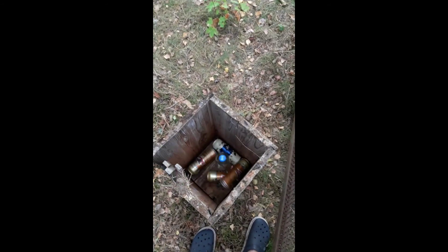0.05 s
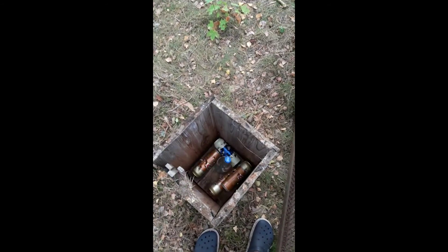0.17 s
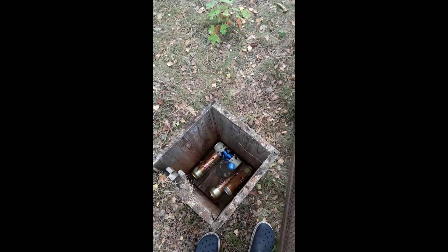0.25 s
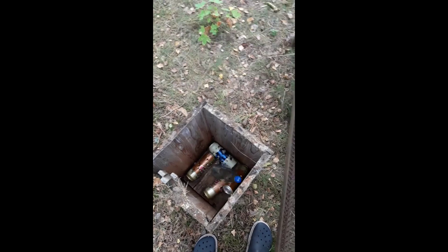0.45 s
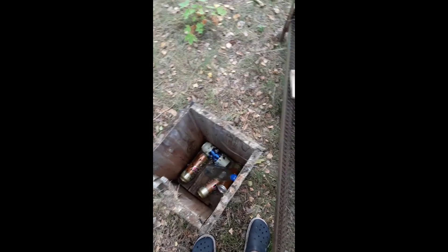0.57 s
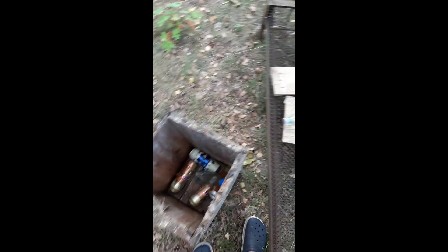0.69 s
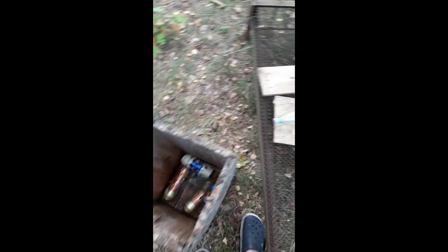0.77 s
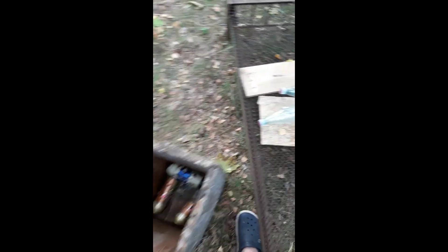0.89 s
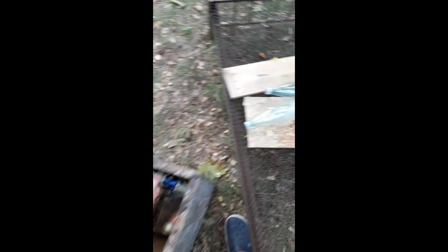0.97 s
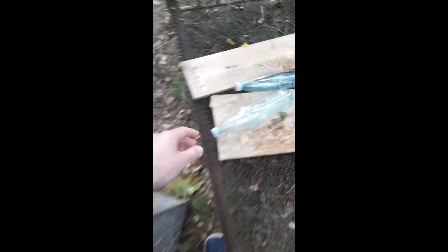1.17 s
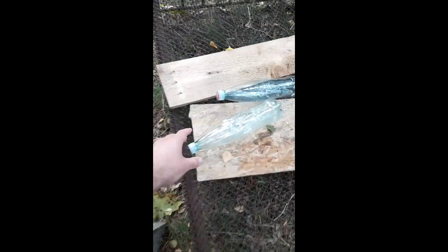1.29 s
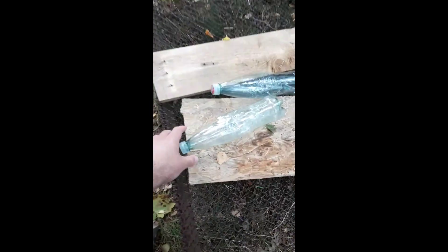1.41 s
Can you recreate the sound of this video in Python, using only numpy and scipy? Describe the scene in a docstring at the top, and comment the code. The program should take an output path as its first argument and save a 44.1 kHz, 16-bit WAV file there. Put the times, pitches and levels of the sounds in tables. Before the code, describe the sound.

At about 0.2 seconds, cans and bottles drop into a metal bin with a loud clatter of hollow knocks and short ringing clangs. From 0.5 seconds one can rolls, scraping and making the bin hum, then hits another with a bright clack near 0.65. Everything settles by 0.8. From about 1.1 to 1.45 seconds, sleeves and dry leaves rustle faintly with a few small taps over quiet outdoor air.

```python
"""Cans and bottles tumble into an open metal bin and clatter against its walls and each other for 0.5 s.
Each collision gives a hollow knock and rings the modes of bin and cans. One can rolls, making the bin
hum, and strikes its neighbour with a bright clack before all settle. Then sleeves and dry leaves
rustle faintly, with a few small taps, over quiet outdoor air."""
import sys
import numpy as np
from scipy import signal
from scipy.fft import rfft, irfft, next_fast_len
from scipy.io import wavfile

SR = 44100
rng = np.random.default_rng(int(sys.argv[2]) if len(sys.argv) > 2 else 0)


def generate_wav(sig):
    """Save sig (samples, or channels by samples) to the path in sys.argv[1] as 16-bit PCM at SR."""
    pcm = np.round(np.clip(np.atleast_2d(sig).T, -1, 1) * 32767).astype(np.int16)
    wavfile.write(sys.argv[1], SR, pcm)


N = 63945

# collisions: start_s, knock_db, knock_hz, bin_db, cans_db, clash_db
COLLISIONS = [(0.218, -16.5, 611, -23.5, -21.5, -18), (0.2385, -40, 1004, -20, -23.5, -21),
              (0.248, -9.5, 796, -14.5, -17, -11.5), (.263, -20, 700, -32, -17, -12),
              (0.2711, -26, 870, -27, -16, -18), (0.2829, -15.5, 428, -16.5, -18, -16),
              (0.2924, -21, 366, -15, -19.5, -18.5), (.311, -23, 420, -19.5, -17.5, -21),
              (0.328, -16, 570, -18.5, -22.5, -29.5), (.346, -20, 668, -23, -17.5, -42),
              (0.354, -17, 420, -16, -19, -28.5), (.376, -16, 837, -17.5, -19.5, -29),
              (.388, -19, 437, -28, -31.5, -28.5), (0.3947, -10, 398, -26, -21, -34),
              (0.413, -19.5, 700, -17, -25.5, -31.5), (.436, -24, 1147, -20, -27.5, -26.5),
              (0.4523, -16, 392, -54, -26, -33.5), (0.464, -19.5, 366, -24, -31.5, -39.5),
              (0.4848, -17.5, 437, -27.5, -29.5, -40), (0.4969, -56, 740, -33.5, -55, -33.5),
              (.512, -53.5, 760, -59, -35.5, -25), (0.521, -43.5, 300, -32, -29, -31.5),
              (.529, -27, 730, -35, -28.5, -37.5), (.551, -37.5, 780, -36, -28, -40.5),
              (.565, -35, 770, -30, -30.5, -43.5), (0.5976, -26.5, 580, -26, -44.5, -59),
              (0.614, -31, 1010, -36.5, -35, -39.5), (0.634, -36.5, 700, -27.5, -30, -30.5),
              (0.6522, -25, 975, -29.5, -26, -21), (.678, -27.5, 933, -32, -30.5, -62),
              (0.701, -41, 428, -39.5, -39, -64), (.723, -34, 435, -55, -38, -39.5),
              (0.744, -45.5, 1680, -47, -42.5, -68), (0.773, -46.5, 436, -50, -51.5, -59.5),
              (0.8049, -62, 850, -52, -62.5, -62)]
# crowd of weak treble modes: freq_hz, density_db
TREBLE_CROWD = [(800, -39), (2400, 3.5), (3300, -5), (3800, -11), (4500, 2), (5400, -2.5), (6300, -5.5),
                (7300, -2.5), (7900, -20.5), (9000, -16.5), (10200, -13), (13000, -17)]


def amp(db):
    """Decibels to gain."""
    return 10 ** (np.asarray(db) / 20)


def unit(x):
    """Scale to rms 1."""
    return x / np.sqrt(np.mean(x ** 2) + 1e-20)


def curve(rows, column=1):
    """One column of a time table, per sample."""
    rows = np.array(rows)
    return np.interp(np.arange(N) / SR, rows[:, 0], rows[:, column])


def noise(spectrum, size=N):
    """Noise of rms 1, shaped by rows of freq_hz, density_db."""
    freq_hz, density_db = np.transpose(spectrum)
    n_fft = next_fast_len(size)
    grid_hz = np.fft.rfftfreq(n_fft, 1 / SR)
    gain = amp(np.interp(np.log(grid_hz + 1), np.log(freq_hz), density_db))
    return unit(irfft(rfft(rng.standard_normal(n_fft)) * gain, n_fft)[:size])


def fade(t, t60_s):
    """Exponential decay, 60 dB in t60_s."""
    return np.exp(-np.log(1000) * t / t60_s)


def onset(t, attack_s=0.0017):
    """Fast rise of a contact."""
    return 1 - np.exp(-t / attack_s)


def add(track, start_s, sound):
    """Mix a sound in at start_s."""
    start = round(start_s * SR)
    track[start:start + len(sound)] += sound[:N - start]


def highpass(x, cutoff_hz, order):
    """Butterworth high-pass."""
    return signal.sosfilt(signal.butter(order, cutoff_hz, "high", fs=SR, output="sos"), x)


def air(level_db=-62):
    """Quiet outdoor air and low buffeting of a moving microphone."""
    air_spectrum = [(20, -13), (60, -15.5), (130, -9.5), (195, 3.5), (280, -4), (850, -5.5), (1400, -12.5),
                    (3000, -19), (5000, -20.5), (7200, -27), (8200, -32.5), (13000, -31.5)]  # freq_hz, density_db
    buffet_levels = [(0, -85), (1.24, -77), (1.3, -64.5), (1.35, -60.5), (1.39, -78), (1.45, -62)]  # time_s, level_db
    buffet_spectrum = [(20, -1), (70, -3), (110, -5.5), (300, -36), (1000, -75.5)]  # freq_hz, density_db
    return amp(level_db) * noise(air_spectrum) + amp(curve(buffet_levels)) * noise(buffet_spectrum)


def rustle(grain_db=2, broad_db=-4.5):
    """Grainy friction of sleeves and single crackles of dry leaves."""
    sleeve_levels = [(0, -68.5), (.2, -78.5), (.96, -73.5), (1.03, -64), (1.13, -61.5), (1.149, -51),
                     (1.165, -61), (1.24, -62), (1.29, -63.5), (1.38, -64.5), (1.45, -63.5)]  # time_s, level_db
    cloth_spectrum = [(100, -11.5), (400, -8.5), (1400, -0.5), (2200, -1.5), (2700, -13), (4400, -9.5),
                      (6000, -10.5), (7200, -1), (8000, -15.5), (13000, -18)]  # freq_hz, density_db
    crackles = [(.028, -60, 4630), (.039, -52, 4840), (0.048, -59, 5670), (.102, -59, 4770),
                (1.15, -56, 7400), (1.186, -52.5, 7230), (1.332, -51, 6860), (1.367, -49.5, 7100),
                (1.4049, -46, 6830), (1.418, -45, 7260), (1.437, -50, 7150)]  # start_s, level_db, pitch_hz
    friction = noise(cloth_spectrum)
    grains = amp(grain_db * noise([(100, -2.0), (400, -11.5), (1500, -68.5)]))
    out = amp(curve(sleeve_levels)) * unit(friction * grains)
    t = np.arange(SR // 20) / SR
    for start_s, level_db, pitch_hz in crackles:
        pitched = noise([(pitch_hz * 0.89, -40), (pitch_hz, 0), (pitch_hz * 1.1, -40)], len(t))
        broad = noise([(1000, -23), (3500, 5), (7500, 2), (13000, -10.5)], len(t))
        add(out, start_s, amp(level_db) * (pitched + amp(broad_db) * broad) * fade(t, t60_s=0.01))
    return out


def taps():
    """Small dull handling taps: a damped tone with some grit."""
    contacts = [(1.148, -41, 2170, 0.013), (1.2973, -41, 1310, 0.018), (1.3311, -40, 1320, 0.0069),
                (1.3325, -49, 445, 0.016)]  # start_s, level_db, pitch_hz, t60_s
    out, t = np.zeros(N), np.arange(SR // 20) / SR
    for start_s, level_db, pitch_hz, t60_s in contacts:
        tone = np.sin(2 * np.pi * pitch_hz * t)
        grit = noise([(pitch_hz / 4, -20), (pitch_hz, 0), (pitch_hz * 1.3, -5), (pitch_hz * 3, -25)],
                     len(t))
        add(out, start_s, amp(level_db) * (tone + 0.36 * grit) * fade(t, t60_s))
    return out


def scrape(grain_db=2.5):
    """The rolling can's rim scrapes along between collisions."""
    scrape_levels = [(.47, -100), (.52, -38), (.6, -53), (.65, -32), (.7, -100)]  # time_s, level_db
    grains = amp(grain_db * noise([(100, 2), (400, -8), (1500, -61.5)]))
    return amp(curve(scrape_levels)) * unit(noise(TREBLE_CROWD) * grains)


def rolling(waver_db=1.0, grind_db=-8):
    """A rolling can grinds on the floor and keeps up a wavering hum in the bin."""
    hum_track = [(.46, 110, -100), (.485, 118, -63), (.52, 131, -48.5), (.56, 154.5, -56), (.6, 162.6, -60),
                 (.64, 182.2, -37), (.705, 187, -39), (.735, 186.7, -53), (.77, 195.2, -44.5),
                 (.82, 186.8, -100)]  # time_s, pitch_hz, level_db
    waver = amp(waver_db * noise([(25, 0.5), (60, -20.5), (200, -91)]))
    hum = waver * np.sqrt(2) * np.sin(2 * np.pi * np.cumsum(curve(hum_track)) / SR)
    grind = noise([(25, -14.5), (70, -8.5), (130, 0), (200, 2.5), (400, -5), (1000, -35.5)])
    return amp(curve(hum_track, column=2)) * (hum + amp(grind_db) * grind)


def struck(t, modes, crowd_spectrum, ring_db, crowd_db, crowd_t60_s, tail_db, tail_t60_s, scatter_db=2):
    """One contact: clear modes, randomly excited, in a crowd of weak ones (noise with two decays)."""
    freq_hz, level_db, t60_s = np.transpose(modes)[:, :, None]
    gain = amp(level_db + scatter_db * rng.standard_normal(level_db.shape))
    phase = 2 * np.pi * rng.random(level_db.shape)
    partials = gain * np.sin(2 * np.pi * freq_hz * t + phase) * fade(t, t60_s)
    ring = partials.sum(0) / np.sqrt(np.sum(gain ** 2) / 2)
    decay = amp(crowd_db) * fade(t, crowd_t60_s) + amp(tail_db) * fade(t, tail_t60_s)
    crowd = noise(crowd_spectrum, len(t)) * decay
    return (amp(ring_db) * ring + crowd) * onset(t)


def clashes():
    """Collisions ring the cans' high modes; rim meets rim with a sharp tick."""
    high_modes = [(3477, -6.5, 0.22), (4050, -6, 0.077), (4190, 0.5, 0.069), (4780, -5, 0.035),
                  (4770, -1.5, 0.092), (5340, 1.5, 0.084), (5450, 0.5, .1), (5990, -9.5, 0.13),
                  (5830, -5.5, .07), (7670, -8.5, .06), (7340, -6.5, 0.087), (7300, 1.5, 0.044)]  # freq_hz, level_db, t60_s
    rim_ticks = [(0.248, -22, 11000, 0.054), (.263, -20, 10500, 0.026), (0.2846, -13, 1810, 0.014),
                 (0.48, -26.5, 4930, 0.02), (0.4869, -29.5, 6500, 0.013), (0.5003, -24.5, 5100, 0.012),
                 (0.6549, -18.5, 4970, 0.033), (0.656, -15, 6880, 0.027)]  # start_s, level_db, pitch_hz, t60_s
    tick_spectrum = [(.1, -80), (.4, -28), (.8, -10), (1, 0), (1.2, -12), (2, -28)]  # pitch_ratio, density_db
    out, t = np.zeros(N), np.arange(SR // 3) / SR
    for start_s, *_, clash_db in COLLISIONS:
        clash = struck(t, high_modes, TREBLE_CROWD, ring_db=-5.5,
                       crowd_db=2.5, crowd_t60_s=0.0546, tail_db=-14, tail_t60_s=0.3)
        add(out, start_s, amp(clash_db) * clash)
    for start_s, level_db, pitch_hz, t60_s in rim_ticks:
        tick = noise([(ratio * pitch_hz, db) for ratio, db in tick_spectrum], len(t))
        add(out, start_s, amp(level_db) * tick * fade(t, t60_s))
    return out


def clangs(swell_s=0.0031):
    """A can struck squarely sings on one mode, which swells and dies away."""
    strikes = [(.285, -3.5, 1020, 0.058), (.286, -5.5, 1794, .04), (.298, -15.5, 851, 0.085),
               (0.331, -11.5, 1051, 0.11), (0.356, -11.5, 1044, 0.14), (.405, -14.5, 849, 0.091),
               (.471, -17, 1061, 0.14), (.485, -25.5, 757, 0.15), (.522, -29, 548.4, 0.18),
               (0.539, -26.5, 998, 0.37), (.594, -27, 769, 0.26), (0.656, -30.5, 1590, 0.37),
               (.697, -22.5, 905, 0.1), (0.723, -32, 1652, .14), (.735, -42.5, 840, 0.3),
               (.803, -58.5, 1070, 0.46)]  # start_s, level_db, pitch_hz, t60_s
    out, t = np.zeros(N), np.arange(SR // 2) / SR
    swell = 1 - np.exp(-(t / swell_s) ** 2)
    for start_s, level_db, pitch_hz, t60_s in strikes:
        tone = np.sin(2 * np.pi * (pitch_hz * t + rng.random()))
        add(out, start_s, amp(level_db) * tone * fade(t, t60_s) * swell)
    return out


def clatter(knock_gain_db=2.5):
    """Every collision gives a hollow knock and rings the bin's walls and the cans."""
    knock_modes = [(.52, -10, 0.043), (1, 3, .035), (1.17, -6.5, 0.035), (1.45, -9.5, .025)]  # pitch_ratio, level_db, t60_s
    bin_modes = [(193.8, -14.5, 0.29), (300.6, -6, 0.22), (457.5, -14.5, 0.59), (546.8, -10.5, 0.25),
                 (689.2, -6, 0.13), (748, -9.5, 0.18), (852.4, -2.5, 0.15), (1003, -4, 0.16),
                 (1043, -2.5, 0.18), (1045, -13.5, 0.62), (1150.7, -4, .18)]  # freq_hz, level_db, t60_s
    can_modes = [(1586, 0.5, 0.073), (1728, -7.5, 0.14), (1897, -6.5, 0.13), (1820, -19, 0.19),
                 (2105, -4.5, 0.16), (2340, -3, 0.22), (2316, -2, 0.21), (2560, -0.5, 0.084),
                 (2730, -11, 0.06), (2940, -8, 0.13)]  # freq_hz, level_db, t60_s
    bin_crowd = [(30, -19.5), (100, -20), (220, -19), (400, -1.5), (620, -7.5), (800, -4), (1120, 2),
                 (1350, -9.5), (2000, -41.5), (4000, -76.5)]  # weak modes: freq_hz, density_db
    can_crowd = [(500, -50.5), (1150, -10.5), (1400, -7.5), (1700, 1.5), (2000, -6), (2400, -1),
                 (2800, -15.5), (3300, -17), (6000, -22.5), (13000, -42)]  # weak modes: freq_hz, density_db
    out, t = np.zeros(N), np.arange(SR // 2) / SR
    for start_s, knock_db, knock_hz, bin_db, cans_db, _ in COLLISIONS:
        knock = sum(amp(db) * np.sin(2 * np.pi * (ratio * knock_hz * t + rng.random())) * fade(t, t60_s)
                    for ratio, db, t60_s in knock_modes)
        walls = struck(t, bin_modes, bin_crowd, ring_db=-1.5,
                       crowd_db=-2.5, crowd_t60_s=0.0557, tail_db=-13.5, tail_t60_s=0.4147)
        cans = struck(t, can_modes, can_crowd, ring_db=-4.5,
                      crowd_db=-3.5, crowd_t60_s=0.14, tail_db=-6.5, tail_t60_s=0.1085)
        add(out, start_s, amp(knock_db + knock_gain_db) * knock * onset(t))
        add(out, start_s, amp(bin_db) * walls + amp(cans_db) * cans)
    return highpass(out, cutoff_hz=123, order=2)  # a small bin radiates little bass


def scene():
    """Central mix; only the treble widens and narrows by turns."""
    width = [(.19, -12.5), (.225, 0.5), (.28, -41), (.32, -56.5), (.37, 6), (.425, -54), (.46, -17.5),
             (.49, -2), (.57, -2), (.605, -27), (.645, -39.5), (.665, -8.5), (.86, -9.5), (1.4, -7.5)]  # stereo spread: time_s, side_gain_db
    mid = clatter() + clangs() + clashes() + rolling() + scrape() + taps() + rustle() + air()
    treble = highpass(clashes() + rustle() + air(), cutoff_hz=4150, order=32)
    side = amp(curve(width)) * treble
    return np.array([mid + side, mid - side])


def record(dry):
    """Round off peaks near full scale, then limit the band."""
    top_hz, edge_hz = 13150, 300
    limited = dry / (1 + np.abs(dry) ** 6) ** (1 / 6)
    n_fft = next_fast_len(N + SR // 2)
    passband = np.clip((top_hz - np.fft.rfftfreq(n_fft, 1 / SR)) / edge_hz + .5, 0, 1)
    return irfft(rfft(limited, n_fft) * passband, n_fft)[:, :N]


dry = scene()
out = record(dry)
generate_wav(out)
```